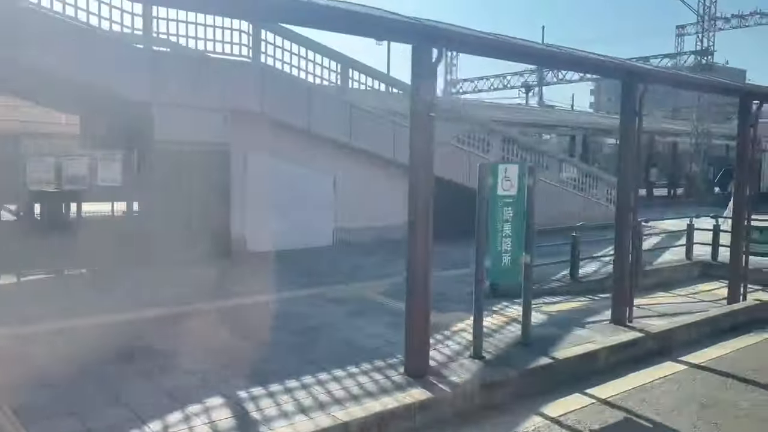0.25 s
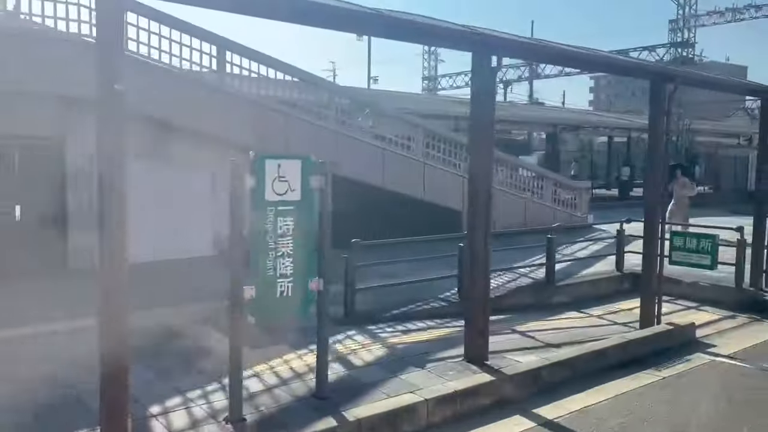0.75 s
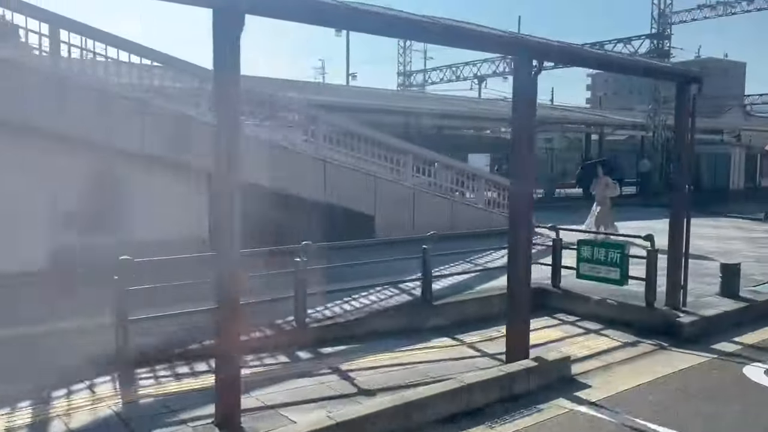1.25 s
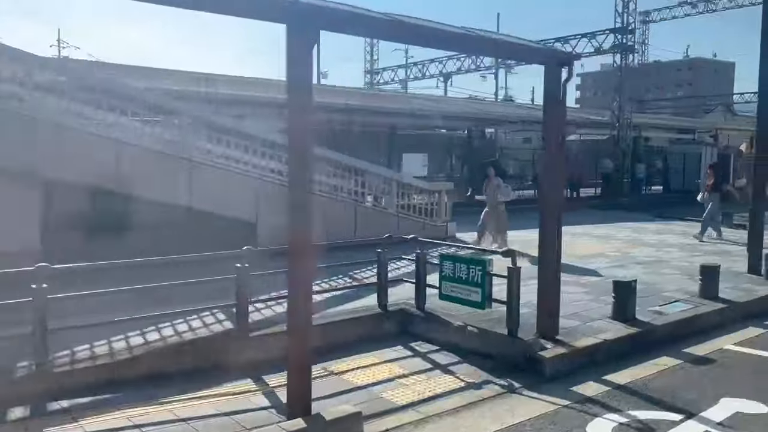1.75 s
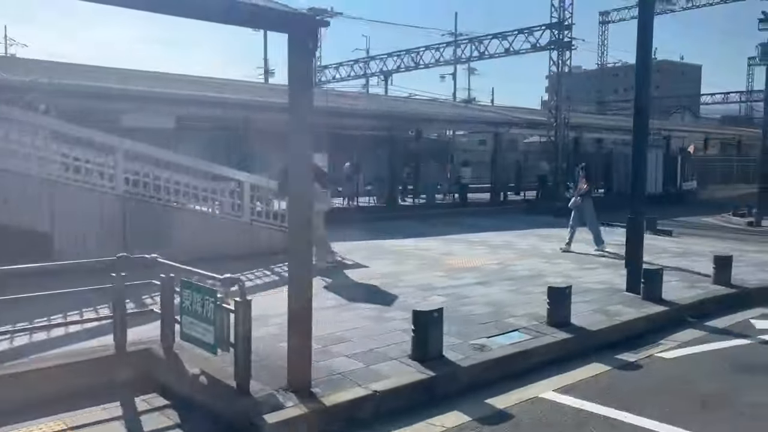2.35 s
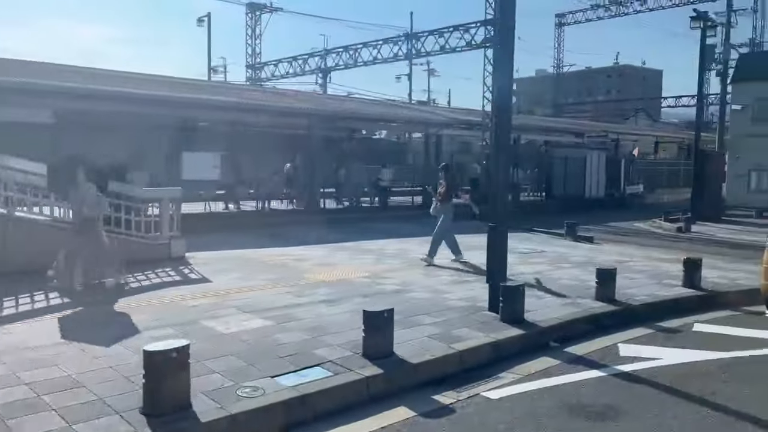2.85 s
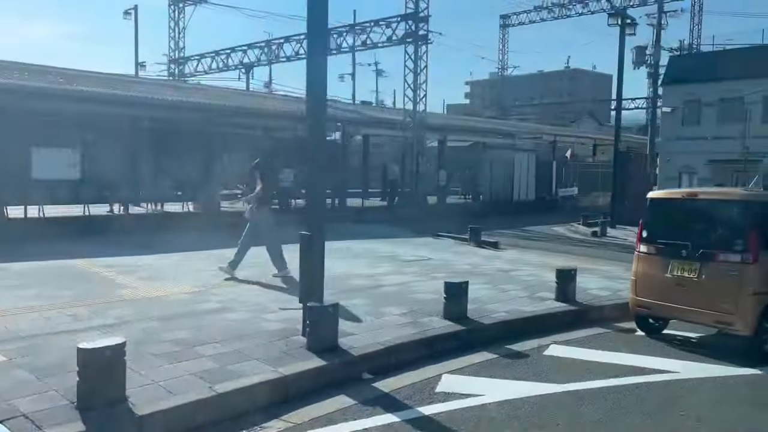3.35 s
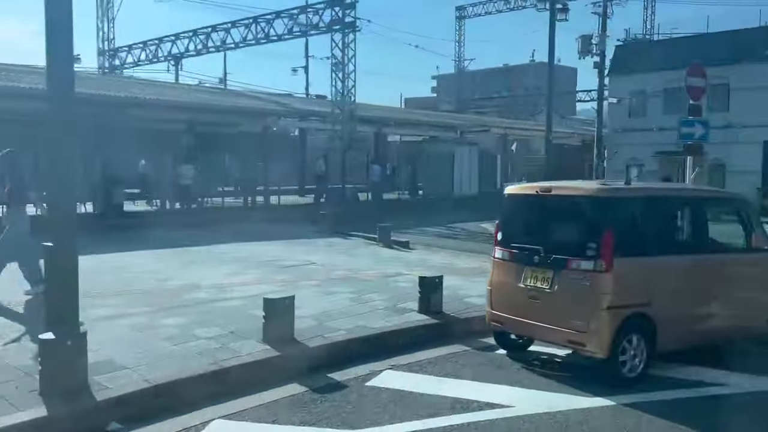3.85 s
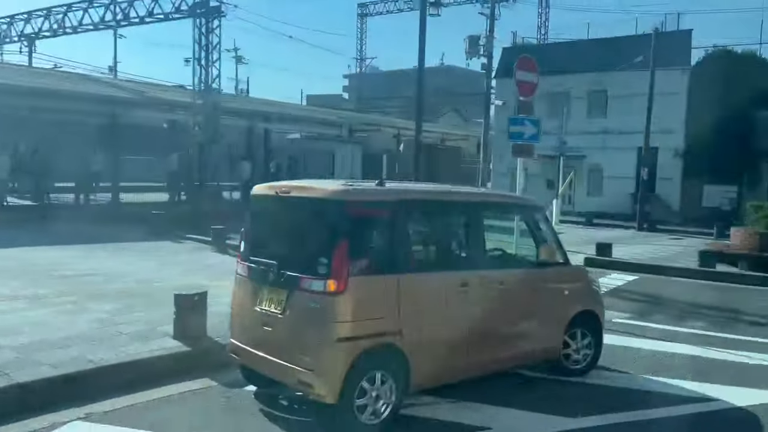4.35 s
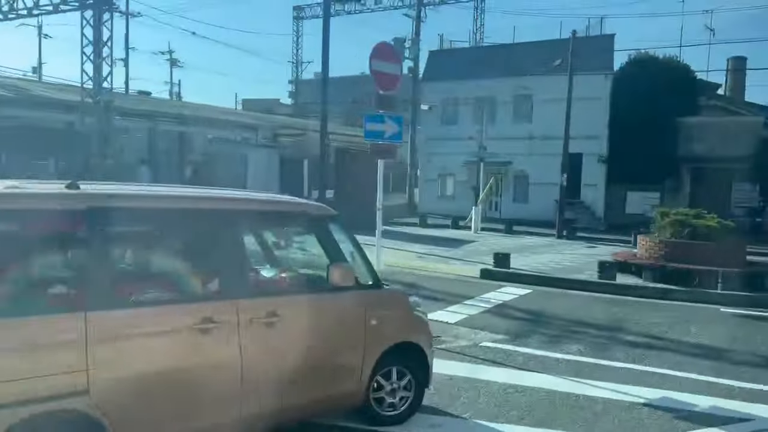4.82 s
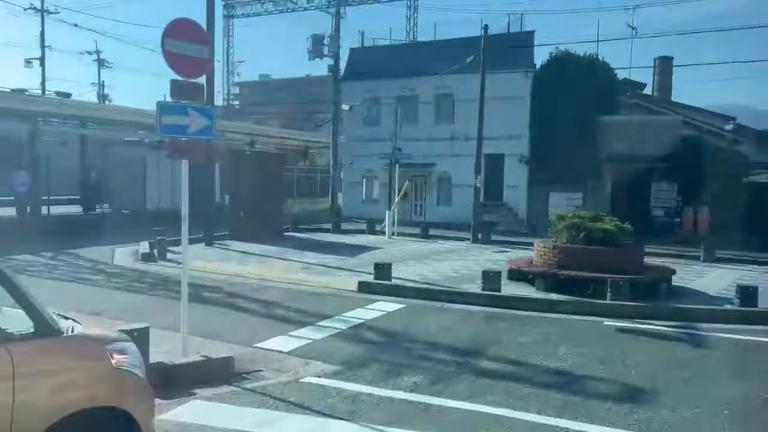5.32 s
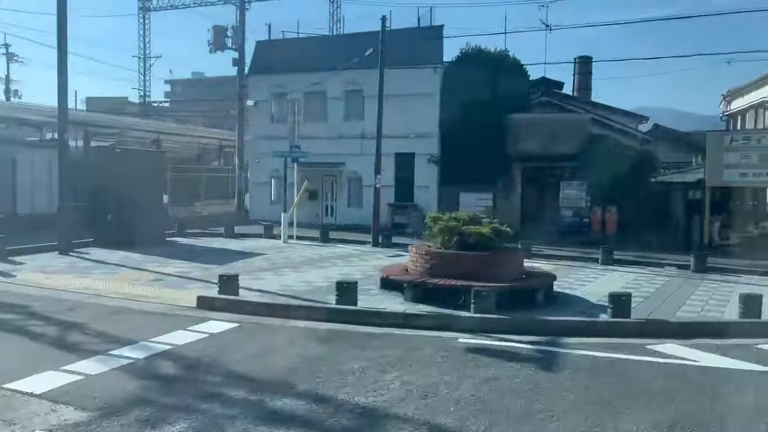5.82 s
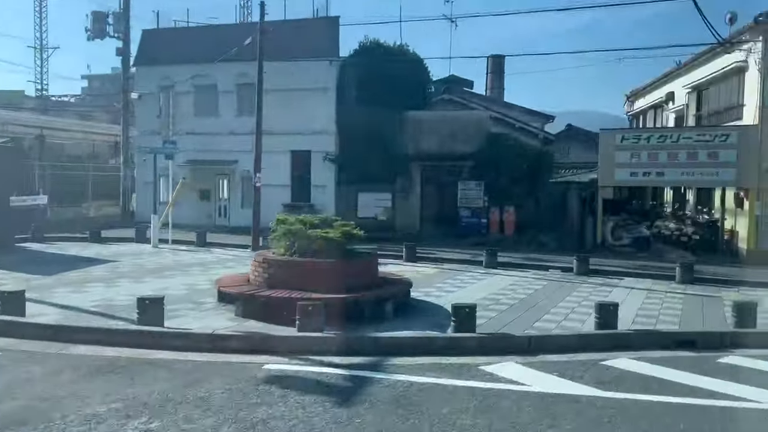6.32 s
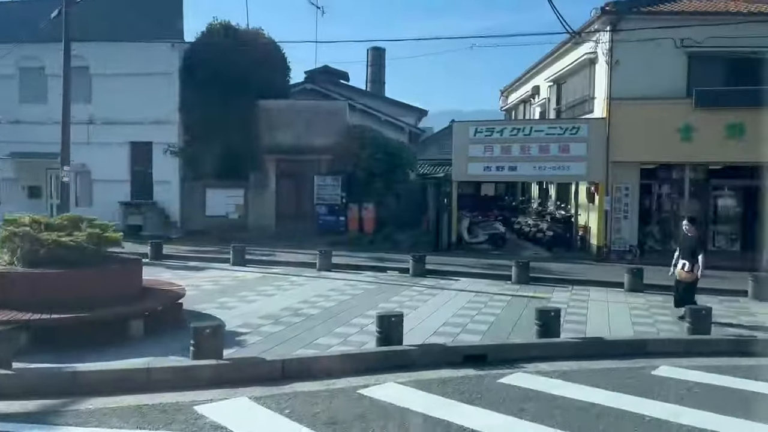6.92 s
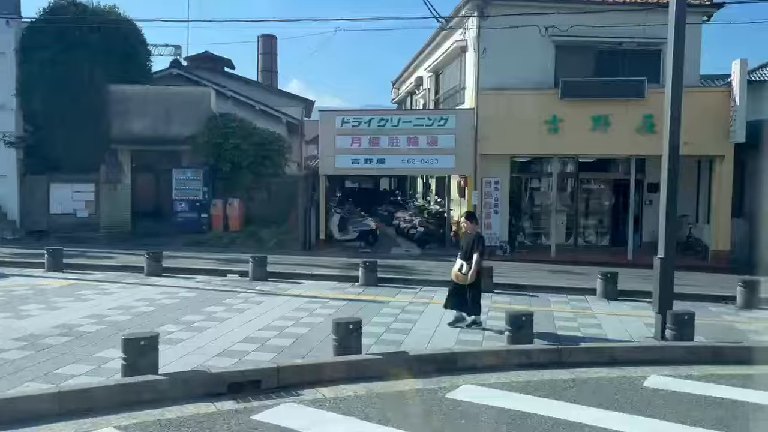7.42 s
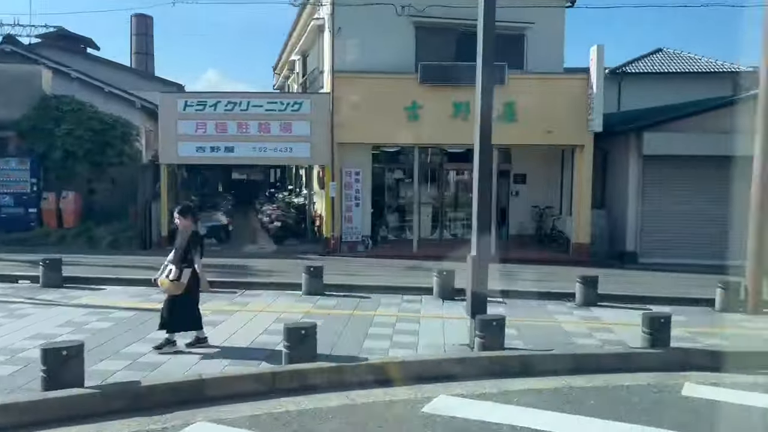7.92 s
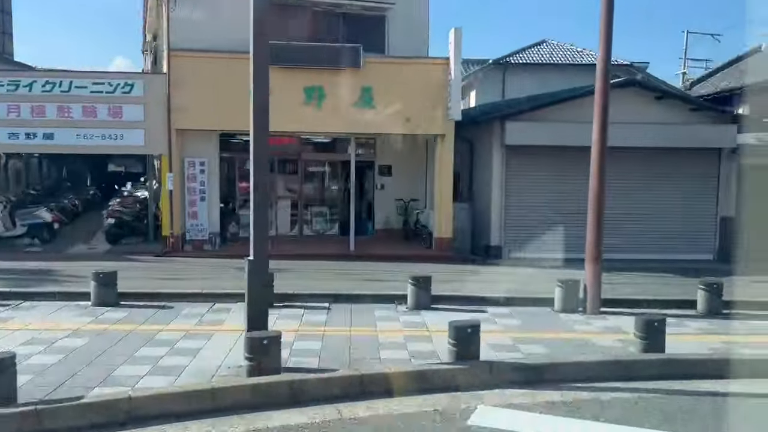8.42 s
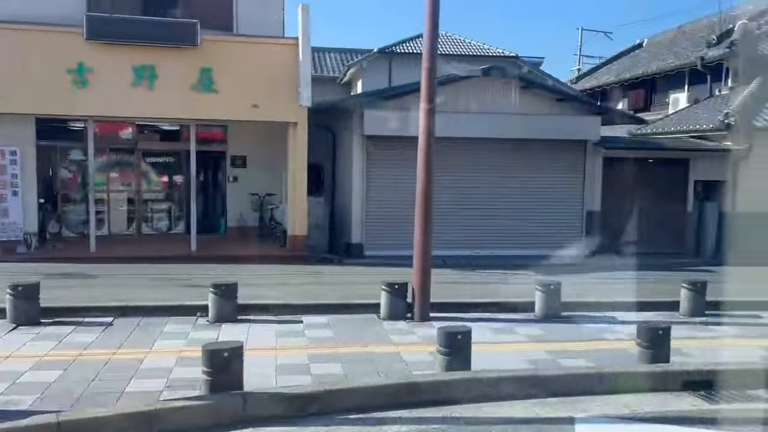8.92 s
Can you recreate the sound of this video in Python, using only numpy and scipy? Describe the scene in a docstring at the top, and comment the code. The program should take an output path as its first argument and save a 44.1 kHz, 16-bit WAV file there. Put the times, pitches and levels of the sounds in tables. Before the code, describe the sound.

Inside a bus slowing round a bend by a small town station, heard from a window seat in muffled, bass-heavy stereo. From 0 s a low diesel drone and a faint, wavering gear whine sink together, quickly until about 5 s, then more slowly and unevenly. Road rumble comes through the floor, strongest around 1 to 2 s, beneath soft, steady vent air and very faint grainy trim rustle. A tiny rattle comes at 1 s; dull suspension thuds follow at about 1.5, 1.7 and 2 s, with a small cluster from 3.3 to 3.7 s. From about 4.3 s a very deep engine boom grows, swelling and easing until roughly 8.5 s, briefly returning near 9.1 s. At 7.5 to 7.9 s another soft thud, a short buzzing rattle and two faint held tones, one mid, one high, appear. Weak squeaks flutter from 8.85 s until the end at 9.2 s.

```python
"""Inside a bus that slows to round a bend. From the start diesel firing orders sink in pitch, a geared
accessory whines at seven times the firing rate, the road rumbles through the floor, air blows from
the vents and trim rustles. Band-limited rattles start after one second and the suspension soon thuds
over a few seams. From about 4.3 s the second firing order booms in swells; towards the end come two
short held tones and a few squeaks. Orders are wavering sines, broad sounds are shaped noise."""
import sys
import numpy as np
from scipy import signal
from scipy.fft import rfft, irfft, next_fast_len
from scipy.io import wavfile

SR = 44100
rng = np.random.default_rng(int(sys.argv[2]) if len(sys.argv) > 2 else 0)


def natural_amplitude(level_db):
    """Convert a level in decibels to a linear amplitude factor, elementwise."""
    exponent = np.asarray(level_db, float) / 20
    return 10 ** exponent


def generate_wav(signal):
    """Clip the signal to [-1, 1] and save it as 16-bit WAV at the path in sys.argv[1]."""
    frames = np.transpose(np.atleast_2d(signal))
    scaled = np.clip(frames, -1, 1) * 32767
    pcm = np.round(scaled).astype(np.int16)
    wavfile.write(sys.argv[1], SR, pcm)


N = 404397

# stereo width of the cabin's noise: pitch_hz, side_minus_centre_db
WIDTH = [(60, -18), (170, -20), (340, -3.5), (600, -5), (730, 3.5), (900, -2.5), (1350, 1), (1700, 1),
         (1900, -4.5), (2350, -6.5), (3000, -1), (3900, -1), (5100, -4), (6200, 5), (7500, 0.5),
         (8300, -14.5), (10800, -18)]
# balance of the cabin's noise: pitch_hz, left_minus_right_db
LEAN = [(60, 1), (110, -1.5), (190, -2), (340, 0), (600, -3), (1070, 2), (1910, 1), (3400, 3.5),
        (6060, 0.5), (10800, -1.5)]
# part of the side a quarter turn off the centre: pitch_hz, share
LAG = [(400, 0), (600, -0.39), (800, -.15), (1400, -0.41), (1800, -.45), (2200, 0.13), (5000, .1),
       (7500, .4)]
# cabin resonances and dips: centre_hz, width_hz, boost_db
CABIN_MODES = [(228, 20, 5), (405.5, 30, 4.5), (540, 22, 2.5), (839, 29, 3.5), (1010, 59, -2),
               (1076, 54, 5), (1183, 60, 4), (1200, 80, -1.5), (1537, 81, 4), (1900, 55, 1.5),
               (2600, 150, 5), (2800, 150, 4), (3020, 72, 2)]

# firing rate, sinking in small steps, then hunting: time_s, rate_hz
FIRING_RATE = [(0, 48.5), (.3, 48.46), (.55, 48.04), (.75, 47.9), (1.1, 47.0), (1.45, 45.35), (1.67, 45.0),
               (1.8, 43.55), (1.9, 43.35), (2.03, 43.6), (2.18, 43.2), (2.3, 42.6), (2.4, 41.95),
               (2.5, 41.72), (2.72, 41.7), (2.82, 40.95), (3.0, 40.6), (3.12, 40.58), (3.22, 39.95),
               (3.35, 39.84), (3.55, 39.76), (3.82, 38.62), (4.2, 38.42), (4.58, 38.02), (4.88, 37.05),
               (5.1, 37.25), (5.2, 37.0), (5.38, 36.07), (5.65, 36.65), (6.28, 36.2), (6.78, 36.79),
               (7.08, 36.29), (7.33, 36.47), (7.6, 35.74), (7.8, 35.82), (7.93, 35.7), (8.0, 35.15),
               (8.1, 34.9), (8.44, 34.75), (8.55, 33.9), (8.85, 34.05), (9.17, 33.83)]
HUNT_HZ = 0.07   # quick unsteadiness of the firing rate

# 1st to 6th firing order away from any body mode: level_db
ORDER_DB = [-47.5, -49, -50.5, -58, -61, -67.5]
# body modes that swell a firing order gliding through, and one null: centre_hz, width_hz, boost_db
BODY_MODES = [(37.2, 0.3, -21.5), (40.95, 12, 23.5), (79.3, 4.3, 18.5), (91.3, 5, 17.5), (103, 7, 17.5),
              (117.7, 2.9, 9.5), (138.7, 18, 18.5), (165, 1.8, 14.5), (175, 2, 9.5), (186.7, 7, 19),
              (192.3, 4, 8.5), (220, 7, 7), (225.6, 4.1, 22), (239.7, 5.2, 20.5), (255.7, 13, 17)]
# second order near idle, as the engine is fuelled: time_s, level_db
BOOM = [(4.25, -60), (4.4, -25), (4.58, -39.5), (4.72, -22), (5.4, -17.5), (5.62, -19.5), (5.95, -15.5),
        (6.35, -16), (6.5, -22), (6.8, -16), (7.15, -16.5), (7.6, -18), (7.74, -26.5), (7.9, -22.5),
        (8.15, -22.5), (8.4, -20.5), (8.7, -42), (8.9, -52), (9.08, -19.5), (9.17, -37)]
# the first order sinks by this share of the boom's rise above its onset
FIRST_YIELDS, BOOM_ONSET_DB = 0.47, -26
# accessory hums: multiple of the firing rate
HUM_ORDERS = [9.12, 9.44]
# resonances of the hums: centre_hz, width_hz, boost_db
HUM_MODES = [(303, 24, 6.2), (396, 47, 18.6), (434, 51, 8.2)]
HUM_DB = -69   # away from any mode

# faint comb of upper orders: multiple of the firing rate, level_db before the cabin colour
UPPER_ORDERS = [(8, -57.5), (10, -57.5), (11, -62), (12, -64), (13, -63), (14.5, -66.5), (15, -61),
                (16, -65.5), (17, -67.5), (18, -65.5), (19, -66.5)]
LEFT_LAG_SAMPLES = 18   # the upper orders reach the left channel later

# whine harmonics: multiple of the mesh tone, level_db between resonances
WHINE_HARMONICS = [(4, -77.5), (5, -78), (6, -78), (10, -93)]
# panel resonances that light up a harmonic gliding through: centre_hz, width_hz, boost_db
PANEL_MODES = [(1200, 40, 10.5), (1255, 25, 11), (1346, 22, 12), (1422, 14, 15), (1526, 14, 12),
               (1599, 20, 8), (3370, 49, 23.5), (1626, 29, 13.5), (1680, 22, 9), (1828, 27, 13),
               (1920, 14, 9), (1953, 22, 17)]
# cabin modes that carry the whine alike to both channels: centre_hz, width_hz, boost_db
ALIKE_MODES = [(236.8, 5, 10), (242.8, 4.1, 13.5), (268, 6.9, 6.5), (296.1, 8.1, 15), (307.3, 7, -12),
               (319, 12, 12.5), (340.6, 9, 11.5), (472, 10, 17.5), (512, 5.8, 10.5), (535.3, 17, 16.5),
               (566.5, 24, 13.5), (603, 22, 11.5), (680, 3.9, 15), (712, 8.8, 7.5), (733, 5.5, -4.5),
               (731, 22, 19), (737, 6, 4), (751, 6, 1), (776, 11, -12.5), (781, 10, 16.5), (810, 11, 9.5),
               (831.2, 27, 23), (862, 10, 10), (870, 16, 11.5), (908, 24, 18.5), (950, 20, 7),
               (1020.6, 21, 15), (1780, 64, 15)]
# cabin modes that reach the two channels in opposite phase: centre_hz, width_hz, boost_db
OPPOSED_MODES = [(242, 8, 8.5), (255, 8, 10), (298, 9.2, 12.5), (317, 8, 8.5), (339, 8, 9), (713, 14, 21.5),
                 (740, 24, 10), (766, 20, 20.5), (803, 22, 20), (832, 12, 10.5), (882, 10, 16),
                 (910, 16, 11.5), (1018, 14, 20)]
# harmonics of the mesh tone away from any mode, then the parts in opposite phase
MESH_DB, SECOND_DB, THIRD_DB, SEVENTH_DB = -51, -68, -68, -78
MESH_SIDE_DB, THIRD_SIDE_DB = -62.5, -73
FLUTTER_DB = 4.5   # of the tabulated whine harmonics

# roughness of the road under the wheels, as floor rumble: time_s, level_db
ROAD = [(0, -40.5), (.6, -32.5), (1.4, -33.5), (1.66, -28.5), (1.9, -32.5), (2.8, -37.5), (3.2, -39),
        (3.85, -38), (4.4, -42.5), (7.45, -40.5), (7.7, -36), (8.2, -37.5), (8.63, -38.5), (9.17, -35)]
# spectrum of the body's shake: pitch_hz, relative_db_per_hz
SHAKE = [(12, -32.5), (20, -11), (30, -10), (43, -3.5), (62, 1.5), (98, -1), (135, -9), (200, -17),
         (260, -41), (440, -120)]
# spectrum of the floor's rumble: pitch_hz, relative_db_per_hz
RUMBLE = [(76, -28.5), (130, -5.5), (177, 1), (253, -4), (300, -17.5), (390, -43.5), (660, -120)]
# spectrum of the panels' drone: pitch_hz, relative_db_per_hz
DRONE = [(150, -28.5), (250, -1.5), (328, -8.5), (518, -14), (612, -21), (700, -21.5), (910, -52),
         (1540, -120)]
# level at mean roughness (dB) and share of the roughness swing in dB that is followed
SHAKE_DB, SHAKE_FOLLOWS, DRONE_DB, DRONE_FOLLOWS = -32, 0.28, -42, 0.066

# vents and engine bay: time_s, level_db
AIR_LEVEL = [(0, -51.5), (2.5, -52.5), (8.8, -53.5), (9.17, -50)]
# spectrum of the air: pitch_hz, relative_db_per_hz
AIR = [(300, -27.5), (500, -4), (625, -13), (838, -8), (1310, -16), (1570, -16.5), (2000, -23), (2390, -27),
       (3300, -36.5), (5200, -44), (6000, -56.5), (8000, -62.5), (10000, -67.5), (12000, -80.5)]

# rubs of trim and fabric that stand out: start_s, length_s, dull_rise_db, bright_rise_db
RUBS = [(0, 0.49, 1.5, 2.5), (0.922, 0.35, 5.5, 5.5), (1.548, 0.073, 2, 3), (1.968, .09, 4.5, 0),
        (2.288, .06, 6.5, 3.5), (2.606, 0.064, 6.5, 9.5), (2.769, 0.22, 2.5, 7), (3.292, 0.046, 2.5, 4),
        (3.454, 0.082, 3, 9.5), (3.985, .06, 6, 7), (4.5, .1, 4.5, 0), (4.824, 0.051, 7.5, -1),
        (5.07, 0.13, 3.5, 2.5), (5.756, .05, 7, 3), (6.788, 0.11, 5, -1), (7.95, 0.11, 3, 4.5),
        (8.495, 0.092, 9, 3), (8.859, 0.045, 4, 9.5), (8.952, .2, -3, 4.5)]
DULL_DB, BRIGHT_DB = -72, -81.5   # rustle between rubs
RUSTLE_DB_PER_HZ = 0.33   # the dull rustle fades as the firing rate falls

# buzzes of loose trim: start_s, level_db, centre_hz, factor the band reaches above and below
RATTLES = [(1.035, -64, 4250, 1.1), (4.005, -76, 6200, 1.1), (4.51, -71, 4500, 1.12),
           (7.622, -56.5, 2300, 1.2), (8.51, -68, 3900, 1.15)]
RATTLE_DECAY_S = 0.06

# seams under the wheels: start_s, level_db before the soft onset, pitch_hz
THUDS = [(1.499, -15.5, 157), (1.69, -23, 197), (2.05, -18, 63), (3.347, -25, 217), (3.404, -14.5, 119),
         (3.439, -19, 204), (3.63, -24, 150), (3.659, -20, 156), (7.546, -19, 198)]

# tones that hold a pitch for a while: start_s, length_s, pitch_hz, level_db
HELD = [(7.58, .38, 514, -52), (7.72, 0.22, 1517, -59)]
HELD_EDGE_S = 0.034

# short squeaks: start_s, length_s, pitch_hz, level_db
SQUEAKS = [(8.85, .165, 1480, -53.5), (9.09, .1, 1570, -55), (9.01, 0.14, 700, -44)]

IMAGE_HZ, IMAGE_DB = 9600, -66.5   # carrier of the faint mirror image
FADE_S = 0.004   # soft first and last instant


def rms_one(x):
    """Normalisation: scale a signal to unit rms."""
    return x / np.sqrt(np.mean(x ** 2) + 1e-20)


def in_time(rows):
    """Linear interpolation: the columns of a table as curves over all samples."""
    s, *columns = np.transpose(rows)
    return [np.interp(np.arange(N) / SR, s, c) for c in columns]


def at_hz(points, hz):
    """Interpolation of a tabulated spectrum on a logarithmic frequency axis."""
    return np.interp(np.log(hz), np.log(np.array(points)[:, 0]), np.array(points)[:, 1])


def peaks_db(peaks, hz):
    """Resonance: each mode adds a bell in dB, half its height at half its width off centre."""
    return sum(db / (1 + (2 * (hz - centre) / width) ** 2) for centre, width, db in peaks)


def drift(rate):
    """Low-pass filtered chance: a random curve of unit rms, varying at about the given rate in Hz."""
    pole = np.exp(-80 * np.pi * rate / SR)   # drawn at every 40th sample
    chance = rng.standard_normal(N // 40 + 2002)
    slow = signal.lfilter([1], [1, -2 * pole, pole * pole], chance)[2000:]
    return np.interp(np.arange(N) / 40, np.arange(len(slow)), rms_one(slow))


def cabin_noise(spectrum, low_hz, high_hz, colour=()):
    """Spectral shaping: stereo noise whose centre has unit rms between low_hz and high_hz."""
    size = next_fast_len(N)
    hz = np.maximum(np.arange(size // 2 + 1) * SR / size, 1)
    shape = natural_amplitude(at_hz(spectrum, hz) + peaks_db(colour, hz))
    mid, side = rfft(rng.standard_normal((2, size))) * shape
    lag = np.clip(at_hz(LAG, hz), -1, 1)   # sound from one end of the cabin reaches one channel first
    side = (np.sqrt(1 - lag ** 2) * side - 1j * lag * mid) * natural_amplitude(at_hz(WIDTH, hz))
    in_band = (hz > low_hz) & (hz < high_hz)
    scale = np.sqrt(2 * np.sum(abs(mid[in_band]) ** 2)) / size
    lean = natural_amplitude(at_hz(LEAN, hz) / 2)
    return irfft([(mid + side) * lean, (mid - side) / lean], size)[:, :N] / scale


def tone(turns, db, waver_db, jitter):
    """Amplitude and phase modulation: a sine whose level (rms dB) and phase (radians) waver."""
    level = np.sqrt(2) * natural_amplitude(db + waver_db * drift(6.1))
    return level * np.sin(2 * np.pi * turns + jitter * drift(3.0))


def engine(rate, turns):
    """Forced vibration: firing orders swell on body modes, the second booms as the engine pulls."""
    levels = [db + peaks_db(BODY_MODES, k * rate) for k, db in enumerate(ORDER_DB, 1)]
    boom_db, = in_time(BOOM)
    levels[0] -= FIRST_YIELDS * np.maximum(boom_db - BOOM_ONSET_DB, 0)
    levels[1] = np.maximum(levels[1], boom_db)
    # higher orders are less steady
    orders = [tone(k * turns, db, waver_db=0.17 * k ** 1.5, jitter=0.076 * k)
              for k, db in enumerate(levels, 1)]
    hums = 0
    for k in HUM_ORDERS:
        db = HUM_DB + peaks_db(HUM_MODES, k * rate)
        hums = hums + np.array([tone(k * turns, db, waver_db=4.5, jitter=0.28) for channel in range(2)])
    return sum(orders) + hums


def upper_orders(rate, turns):
    """Periodic impulses: the knock of each firing leaves a comb of orders, lifted by the cabin."""
    comb = sum(tone(k * turns, db + 1.2 * peaks_db(CABIN_MODES, k * rate), waver_db=3.0, jitter=0.5)
               for k, db in UPPER_ORDERS)
    return np.array([np.roll(comb, LEFT_LAG_SAMPLES), comb])


def whine(rate, turns):
    """Gear meshing: seven teeth per firing sound harmonics that swell on cabin and panel modes."""
    mesh, mesh_hz = 7 * turns, 7 * rate
    opposed = np.array([[1], [-1]])

    def alike_db(k):
        return peaks_db(ALIKE_MODES, k * mesh_hz)

    def two_tones(k, db, waver_db, jitter):   # the channels waver independently
        return np.array([tone(k * mesh, db, waver_db, jitter) for channel in range(2)])

    out = tone(mesh, MESH_DB + alike_db(1), waver_db=1.45, jitter=0.23)
    side_db = MESH_SIDE_DB + peaks_db(OPPOSED_MODES, mesh_hz)
    out = out + opposed * tone(mesh, side_db, waver_db=1.0, jitter=0.3)
    out += two_tones(2, SECOND_DB + alike_db(2), waver_db=1.3, jitter=0.31)
    third_db = THIRD_DB + alike_db(3) + 1.5 * drift(10.0)
    out += tone(3 * mesh, third_db, waver_db=1.6, jitter=0.36)
    side_db = THIRD_SIDE_DB + peaks_db(OPPOSED_MODES, 3 * mesh_hz)
    out += opposed * tone(3 * mesh, side_db, waver_db=2.5, jitter=0.3)
    out += two_tones(7, SEVENTH_DB + alike_db(7), waver_db=3.0, jitter=0.87)
    for k, db in WHINE_HARMONICS:
        panel_db = db + peaks_db(PANEL_MODES, k * mesh_hz)
        for channel in range(2):
            flutter_db = FLUTTER_DB * drift(30.0)
            out[channel] += tone(k * mesh, panel_db + flutter_db, waver_db=3.0, jitter=0.99)
    return out


def road():
    """Structure-borne sound: road roughness drives body shake, floor rumble and panel drone."""
    rumble_db, = in_time(ROAD)
    swing_db = rumble_db - rumble_db.mean()
    shake_db = SHAKE_DB + SHAKE_FOLLOWS * swing_db + 0.28 * drift(6.9)
    drone_db = DRONE_DB + DRONE_FOLLOWS * swing_db + 0.69 * drift(3.3)
    shake = natural_amplitude(shake_db) * cabin_noise(SHAKE, 82.2, 110.5)
    rumble = natural_amplitude(rumble_db + 0.56 * drift(3.5)) * cabin_noise(RUMBLE, 160, 340, CABIN_MODES)
    drone = natural_amplitude(drone_db) * cabin_noise(DRONE, 236.0, 900, CABIN_MODES)
    return shake + rumble + drone


def air():
    """Turbulent flow: vents and engine bay give broad noise, coloured by the cabin modes."""
    level_db, = in_time(AIR_LEVEL)
    return natural_amplitude(level_db + 0.7 * drift(5.7)) * cabin_noise(AIR, 898, 2700, CABIN_MODES)


def rustle(rate):
    """Friction noise: two grainy layers of hiss flicker together and change level in short rubs."""
    t, flicker = np.arange(N) / SR, drift(27.0)
    dull_db = DULL_DB + RUSTLE_DB_PER_HZ * (rate - rate.mean()) + 0.92 * flicker
    bright_db = BRIGHT_DB + 0.51 * flicker + 0.54 * drift(11.0)
    for s, length, dull_rise, bright_rise in RUBS:
        rub = np.sin(np.pi * np.clip((t - s) / length, 0, 1))
        dull_db += dull_rise * rub
        bright_db += bright_rise * rub
    # spectra: pitch_hz, relative_db_per_hz
    dull = cabin_noise([(2000, -21.5), (3000, -1.0), (3600, -2.0), (4500, -0.5), (5400, -3.5),
                        (6200, -18.0), (7500, -38.5)], 3000, 5500)
    bright = cabin_noise([(5000, -23.0), (6500, 0.5), (8000, -3.5), (9600, -4.0),
                          (11000, -10.5)], 5500, 8700)
    # quick drifts make the grain
    return natural_amplitude(dull_db + 1.2 * drift(80.0)) * dull + natural_amplitude(bright_db + 0.47 * drift(80.0)) * bright


def rattles():
    """Band-limited decay: a loose panel buzzes for a moment, each time in a band of its own."""
    out, t = np.zeros((2, N)), np.arange(SR // 2) / SR
    shape = np.clip(t / 0.01, 0, 1) * np.exp(-t / RATTLE_DECAY_S)
    for s, db, hz, spread in RATTLES:
        band = signal.butter(2, [hz / spread, hz * spread], "band", fs=SR, output="sos")
        alike, apart = signal.sosfilt(band, rng.standard_normal((2, len(t))))
        buzz = rms_one(alike + 0.51 * apart * [[1], [-1]])
        i = round(s * SR)
        out[:, i:i + len(t)] += natural_amplitude(db) * shape * buzz
    return out * natural_amplitude(2.0 * drift(120.0))


def thuds():
    """Impulse response: each seam kicks the floor into a short ring over a puff of rumble."""
    ring, swell, t = np.zeros(N), np.zeros(N), np.arange(SR // 4) / SR
    t60_s, onset_s = 0.11, 0.0054
    # spectrum: pitch_hz, relative_db_per_hz
    puff = cabin_noise([(40, -11.0), (100, 10.0), (250, -4), (450, -11.5), (700, -39.0),
                        (1500, -100)], 130, 500)
    for s, db, hz in THUDS:
        i = round(s * SR)
        fade = natural_amplitude(db - 60 * t / t60_s) * (1 - np.exp(-t / onset_s))
        ring[i:i + len(t)] += fade * np.sin(2 * np.pi * hz * t)
        swell[i:i + len(t)] += natural_amplitude(-5.0) * fade
    return ring + swell * puff


def held_tones():
    """Gated oscillation: short sines hold their pitch between soft edges."""
    t, out = np.arange(N) / SR, np.zeros(N)
    for s, length, hz, db in HELD:
        gate = np.clip(np.minimum(t - s, s + length - t) / HELD_EDGE_S, 0, 1)
        out += gate * tone(hz * t, db, waver_db=1.5, jitter=0.47)
    return out


def squeaks():
    """Stick-slip friction: rubbing parts sing briefly, with fluttering level and pitch."""
    out, t = np.zeros((2, N)), np.arange(N) / SR
    for s, length, hz, db in SQUEAKS:
        arch = np.sin(np.pi * np.clip((t - s) / length, 0, 1) ** 0.68)
        shape = np.maximum(arch, 0) ** 0.5 * natural_amplitude(3.3 * drift(25.0))
        for channel in range(2):
            turns = hz * t + 0.14 * drift(30.0)
            out[channel] += shape * tone(turns, db, waver_db=2.0, jitter=0.8)
    return out


def scene():
    """Superposition: all sources add up as heard at a window seat."""
    rate, = in_time(FIRING_RATE)
    turns = np.cumsum(rate + HUNT_HZ * drift(7.05)) / SR
    steady = engine(rate, turns) + upper_orders(rate, turns) + whine(rate, turns)
    steady = steady + road() + air() + rustle(rate)
    return steady + rattles() + thuds() + held_tones() + squeaks()


def band_limit(x):
    """A steep low-pass at the top of the band."""
    return signal.sosfilt(signal.butter(12, 11380, fs=SR, output="sos"), x)


def record(dry):
    """Ring modulation: a carrier mirrors the bass faintly into the treble; both ends are softened."""
    mirror = natural_amplitude(IMAGE_DB) * dry * np.cos(2 * np.pi * IMAGE_HZ * np.arange(N) / SR)
    to_nearest_end_s = np.minimum(np.arange(N), np.arange(N)[::-1]) / SR
    fade = np.clip(to_nearest_end_s / FADE_S, 0, 1)
    return band_limit((dry + mirror) * fade)


dry = scene()
out = record(dry)
generate_wav(out)
```